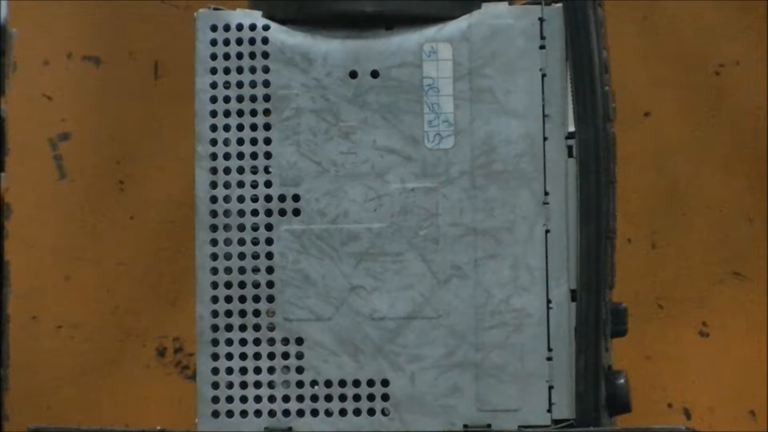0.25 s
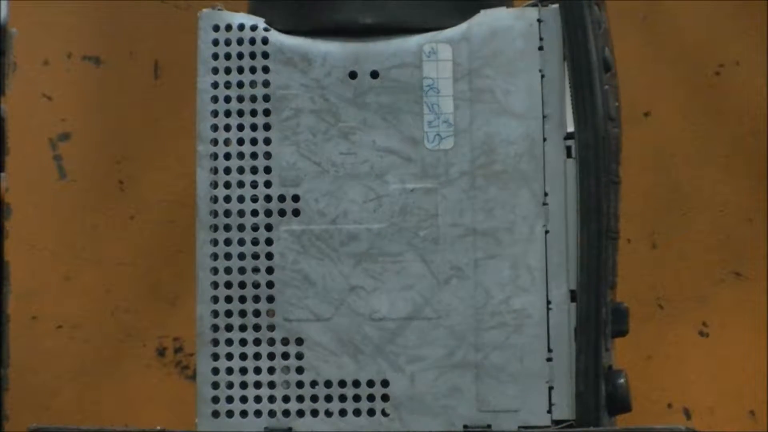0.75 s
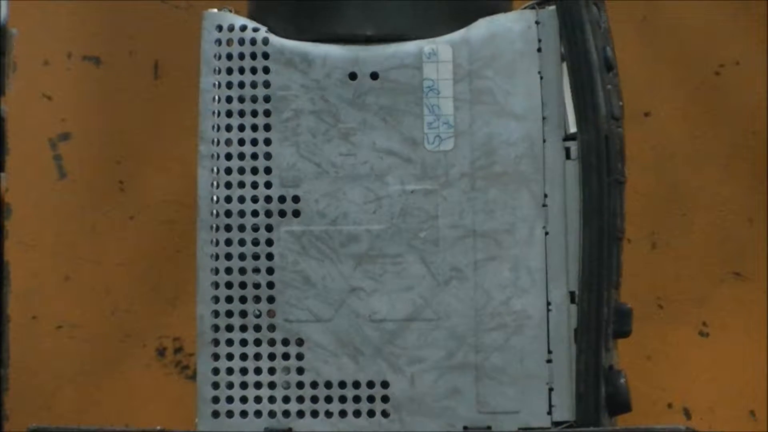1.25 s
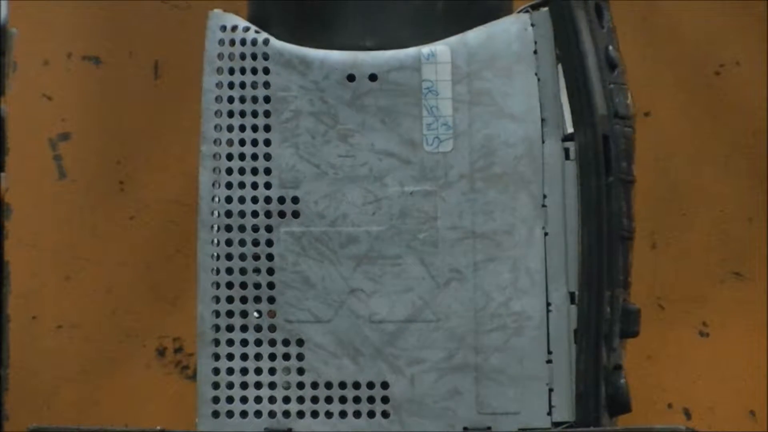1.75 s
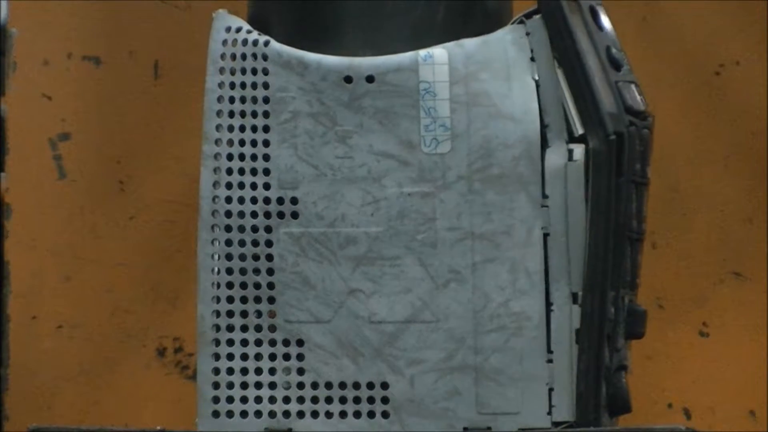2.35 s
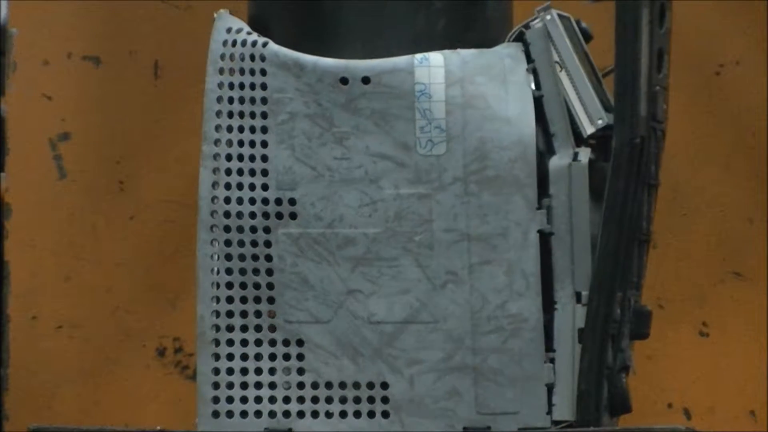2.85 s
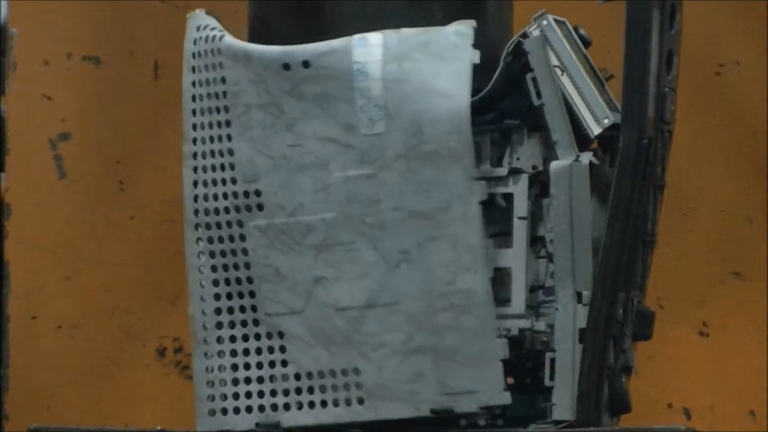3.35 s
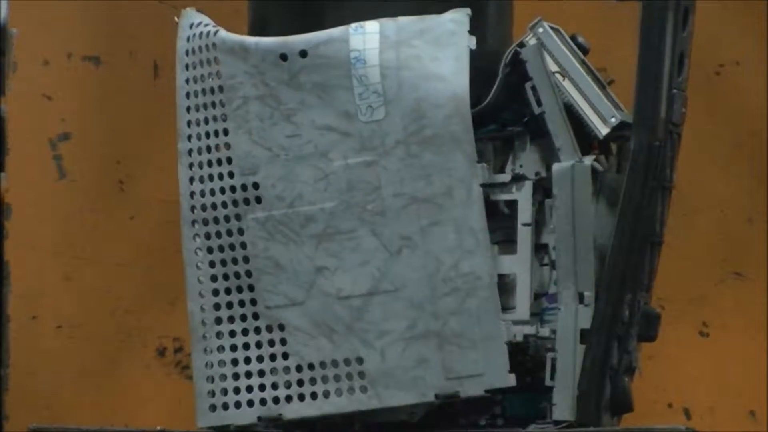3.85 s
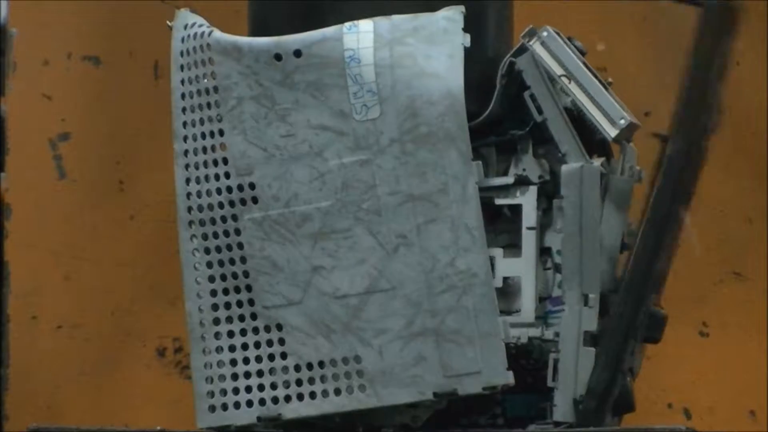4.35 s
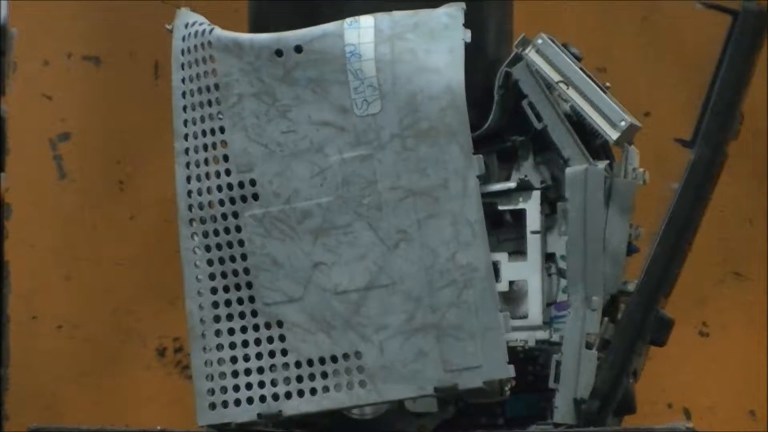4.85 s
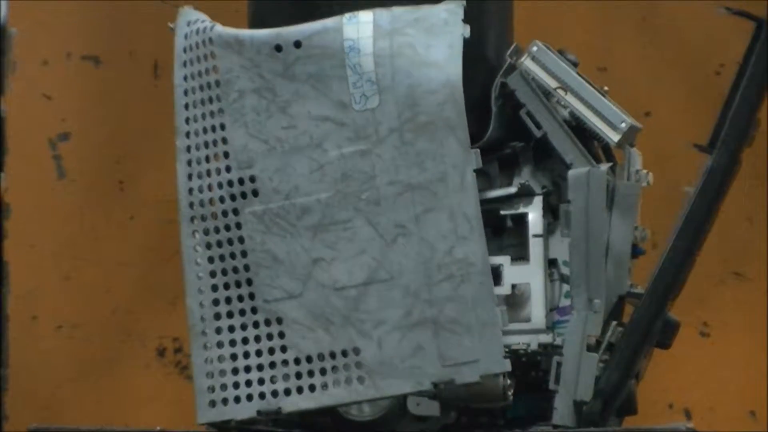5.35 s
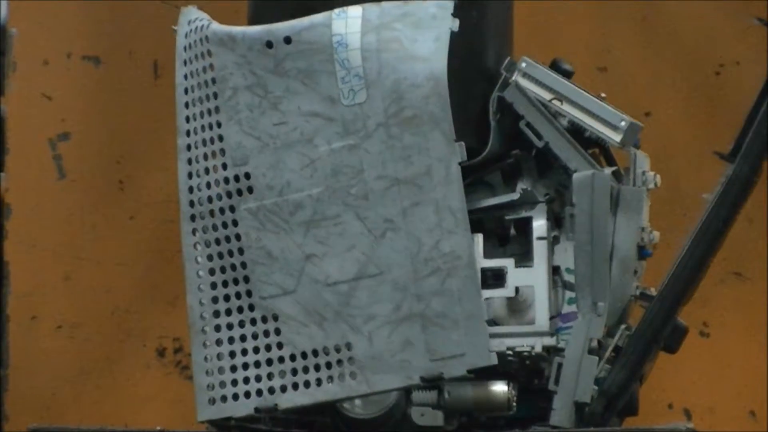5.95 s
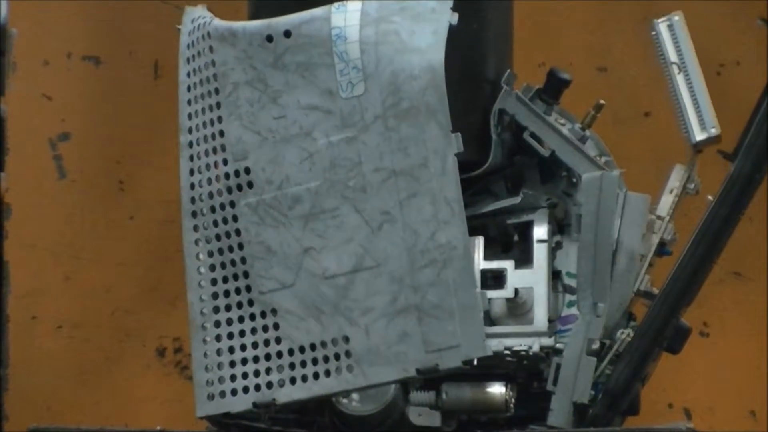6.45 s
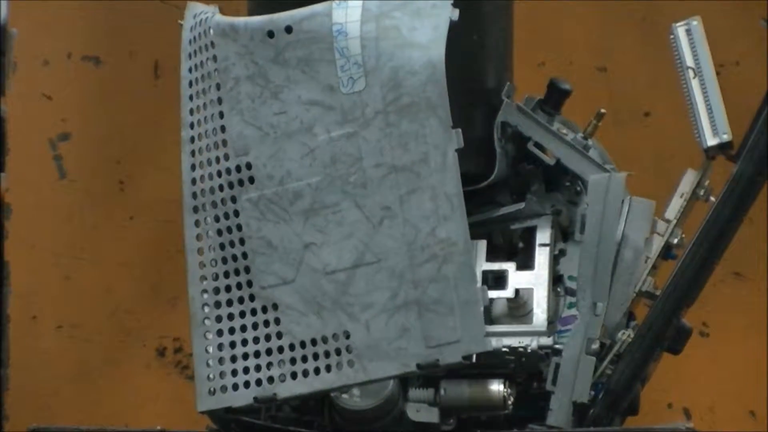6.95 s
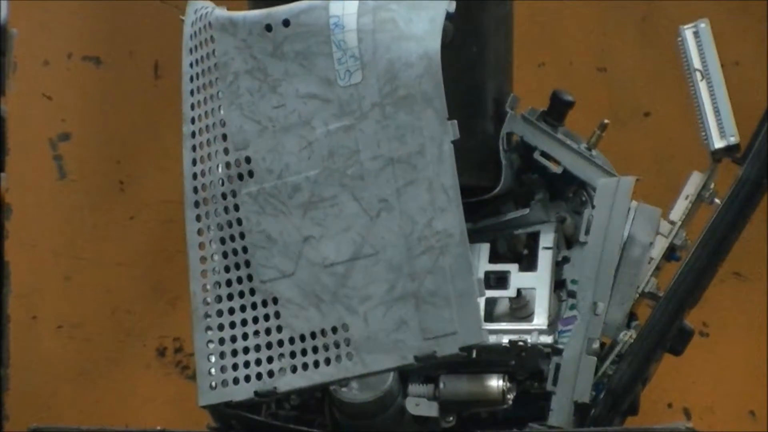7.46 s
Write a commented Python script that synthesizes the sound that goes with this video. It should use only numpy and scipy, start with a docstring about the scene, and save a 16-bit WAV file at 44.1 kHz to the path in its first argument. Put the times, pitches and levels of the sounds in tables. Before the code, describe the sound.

A hydraulic unit whines and hisses while a metal case buckles in sharp crackles, hollow pops and brief scrapes, with short room echoes.

```python
"""Hydraulic press crushing a metal case

A press slowly crushes the sheet-metal case of a device in an echoing workshop. Noise bursts and damped
tones make the snaps; dense tiny bursts make the creaks and scrapes, and wavering tones the groans.
Partials of a turning shaft make the pump's whine, over hissing oil and a rumbling frame.
The recorder's limiter flattens the strong snaps, so the whine sinks and swells back as the echo dies."""
import sys
import numpy as np
from scipy import signal
from scipy.fft import rfft, irfft, next_fast_len
from scipy.io import wavfile
from scipy.ndimage import uniform_filter1d

SR = 44100
rng = np.random.default_rng(int(sys.argv[2]) if len(sys.argv) > 2 else 0)


def unload_wav(signal):
    """Save mono or channel-first audio to the path in sys.argv[1] as 16-bit WAV at rate SR, clipped to [-1, 1]."""
    wavfile.write(
        sys.argv[1],
        SR,
        np.round(np.clip(np.atleast_2d(signal).T, -1, 1) * 32767).astype(np.int16),
    )


N = 339570
TIME = np.arange(N) / SR  # seconds
EDGE_HZ = 16000  # upper edge of the sound


def amp(db):
    """Turns decibels into a gain."""
    return np.exp(np.asarray(db) * (np.log(10) / 20))


def unit(x):
    """Scales a signal to an rms of one."""
    return x / np.sqrt(np.mean(x ** 2) + 1e-20)


def at_hz(points, hz):
    """Reads a table between its points on a log-frequency axis."""
    table_hz, value = np.transpose(points)
    return np.interp(np.log(hz + 1), np.log(table_hz + 1), value)


def curve(points):
    """Reads a table of moments at every sample."""
    return np.interp(TIME, *np.transpose(points))


def drift(rate):
    """A slow random wander of rms one, with `rate` new values a second."""
    knots = rng.standard_normal(400)
    return unit(np.interp(TIME * rate, np.arange(len(knots)), knots))


def power(pair, size=132):
    """Mean power of both channels over three milliseconds."""
    return np.abs(uniform_filter1d((pair ** 2).mean(0), size)) + 1e-14


# How alike the left and right sound. Each row: frequency in Hz, likeness from 0 to 1.
LIKENESS = [(30, 0.98), (300, 0.79), (1200, 0.85), (3000, 0.75), (5000, 0.82), (9000, 0.47), (15000, 0.56)]


def colour(pair, spectrum, bright_db=0):
    """Gives two unrelated signals a spectrum and mixes them into an equally alike left and right."""
    size = pair.shape[1]
    hz = np.fft.rfftfreq(size, 1 / SR)
    mid, side = rfft(pair)
    alike = np.clip(at_hz(LIKENESS, hz), 0, .995)
    mid = mid * np.sqrt((1 + alike) / 2)
    side = side * np.sqrt((1 - alike) / 2)
    # brightness lifts the treble and lowers the rest by 0.8 of its value
    shelf = at_hz([(3500, -0.8), (9500, 0.8)], hz)
    gain = amp(at_hz(spectrum, hz) + bright_db * shelf)
    return irfft(np.array([mid + side, mid - side]) * gain, size)


# The size of a part sets its timbre: wide panels ring low and flex, small tabs ring high and mostly crack.
PANEL_HZ = 1500  # reference pitch
BRIGHT_DB, BRIGHT_DB_PER_OCTAVE = -5, 1.68
FLEX_DB, FLEX_DB_PER_OCTAVE = 13.5, -7  # flexing against fracture, for a 0 dB snap at PANEL_HZ at the start
FLEX_DB_PER_DB = 0.6  # a harder snap bends more of the panel
FLEX_DB_PER_S = -1.93  # the panels stiffen as they fold up


def timbre(s, db, part_hz):
    """Brightness and flexing of a snap in dB: pitch, strength and moment tell how its part bends."""
    octaves = np.log2(part_hz / PANEL_HZ)
    bright_db = BRIGHT_DB + BRIGHT_DB_PER_OCTAVE * octaves
    flex_db = FLEX_DB + FLEX_DB_PER_OCTAVE * octaves + FLEX_DB_PER_DB * db + FLEX_DB_PER_S * s
    return bright_db, flex_db


# The sharp fracture. Each row: frequency in Hz, level in dB per Hz.
FRACTURE_SPECTRUM = [(40, -65), (200, -54), (700, -12.5), (1500, -2), (2800, -3), (4500, -1), (7000, -1),
                     (10000, 1), (13000, -8.5), (16000, -36)]
# The dull flexing of the panel. Each row: frequency in Hz, level in dB per Hz.
FLEX_SPECTRUM = [(40, -28), (200, -15.5), (400, -4.5), (800, 0.5), (1300, 2), (2000, -3), (2800, -1),
                 (4500, -12), (9000, -44)]
PIECE_SPREAD_DB = 2.5  # how much the colour of the fracture differs from piece to piece


def snap(t60, bright_db, panel_db, part_hz, first_db=2, tear=0.073, ring_db=-3.5, part_db=-5,
         ring_width=16, part_spread=0.422, grit_db=3, size=6144):
    """A fracture tears on briefly, scatters through the case as a gritty burst and rings a cluster of modes."""
    t = (np.arange(size) - size // 96) / SR
    age = np.maximum(t - tear * t60, 0)  # long breaks tear for longer before they die away
    decay = (t >= 0) * amp(-60 * age / t60)
    grit = unit(uniform_filter1d(rng.standard_normal(size), size=36))
    fade = decay * amp(grit_db * grit)
    first = 1 + amp(first_db) * np.exp(-np.abs(t) / .0005)  # a stronger first instant
    # each broken piece favours its own bands
    bands_hz = np.geomspace(40, EDGE_HZ, num=40)
    bands_db = at_hz(FRACTURE_SPECTRUM, bands_hz) + PIECE_SPREAD_DB * rng.standard_normal(len(bands_hz))
    piece = np.transpose([bands_hz, bands_db])
    crack = unit(colour(rng.standard_normal((2, size)) * fade * first, piece, bright_db))
    flex = unit(colour(rng.standard_normal((2, size)) * fade, FLEX_SPECTRUM))
    # close, heavily damped modes: the shorter and higher the ring, the wider the cluster
    width_hz = np.hypot(ring_width / t60, part_spread * part_hz)
    cluster = np.linspace(-1, 1, num=25) + rng.uniform(-.04, .04, size=25)
    mode_hz = (part_hz + width_hz * cluster)[:, None]
    strike = rng.uniform(0, 2 * np.pi, size=(len(cluster), 1))
    modes = np.hanning(len(cluster)) ** 2 @ np.sin(2 * np.pi * mode_hz * t + strike)
    ring = unit(modes * np.clip(t * part_hz, 0, 1) * decay)
    # the broken part always rings a little; a flexing panel rings much more
    ring = ring * np.hypot(amp(part_db), amp(panel_db + ring_db) / np.sqrt(2))
    burst = crack + amp(panel_db) * flex / np.sqrt(2)
    # the microphone faces the ringing part; the room gets the burst
    near, spread = burst + ring, burst
    return np.array([near, spread]) / np.sqrt(power(near).max())


# Snaps, loud and faint. Each row: moment in seconds, level in dB of the loudest 3 ms, time in seconds to
# fade by 60 dB, pitch in Hz of the part that gives way.
SNAPS = [(.048, -34, 0.017, 7500), (.063, -33.5, 0.035, 7100), (.0705, -18.5, 0.044, 1840),
         (0.1291, -22.5, 0.036, 1970), (.1526, -31.5, 0.07, 2070), (.186, -14.5, 0.018, 2130),
         (0.3599, -23.5, 0.011, 4700), (.4058, -19, 0.025, 1960), (.432, -29, 0.036, 1310),
         (.453, -28.5, .052, 2160), (0.4729, -14, 0.044, 4140), (0.584, -27.5, 0.028, 4720),
         (.609, -31.5, 0.027, 8060), (.7602, -30.5, 0.029, 8700), (.8128, -32.5, 0.021, 8300),
         (0.858, -25.5, 0.025, 4000), (0.9041, -25, 0.041, 8600), (0.9775, -29.5, 0.04, 4000),
         (1.052, -31, 0.029, 1880), (1.0938, -36, 0.027, 5970), (1.3543, -30, 0.031, 6860),
         (1.3769, -24, 0.048, 4800), (1.443, -27.5, 0.049, 5900), (1.449, -25.5, 0.054, 6570),
         (1.4785, -28, 0.017, 1840), (1.494, -22.5, 0.073, 1600), (1.501, -19, 0.059, 1630),
         (1.5826, -18.5, 0.039, 1630), (1.6282, -23.5, 0.023, 6730), (1.7212, -17.5, 0.036, 1800),
         (1.7697, -23, 0.026, 6900), (1.822, -23.5, 0.023, 9470), (1.861, -31, 0.022, 7040),
         (1.9528, -22, 0.05, 5400), (2.012, -32, 0.031, 6760), (2.0822, -21, 0.08, 1666),
         (2.2082, -32, 0.023, 9540), (2.325, -22.5, 0.055, 9360), (2.3476, -25, 0.054, 2470),
         (2.3773, -24, 0.046, 1450), (2.3861, -20, 0.045, 1980), (2.5198, -23, 0.038, 1240),
         (2.5919, -23.5, 0.072, 4530), (2.716, -36, 0.025, 1930), (2.9785, -32.5, 0.024, 4720),
         (3.159, -36, 0.063, 834), (3.164, -24, 0.054, 1740), (3.2946, -27, 0.031, 1790),
         (3.351, -33, 0.053, 3960), (3.3898, -16, 0.052, 1500), (3.5394, -26, 0.076, 8500),
         (3.6036, -19, 0.032, 1810), (3.6224, -23.5, 0.039, 8900), (3.7254, -19, 0.053, 1750),
         (3.8464, -28, 0.038, 8830), (3.88, -33, .035, 3120), (3.9358, -14, 0.05, 1542),
         (4.2171, -23.5, 0.03, 3550), (4.309, -19.5, 0.064, 5040), (4.374, -22, 0.038, 1430),
         (4.3877, -18.5, 0.055, 1470), (4.505, -32, 0.024, 7650), (4.5237, -31, .031, 7900),
         (4.5398, -31, 0.04, 7850), (4.568, -28, 0.04, 9800), (4.6186, -24, 0.041, 8880),
         (4.6614, -25, 0.057, 1830), (4.6974, -21, 0.058, 5560), (4.7658, -15, 0.055, 1693),
         (4.848, -30.5, .025, 7940), (5.0072, -26, 0.029, 10100), (5.141, -28, 0.032, 6750),
         (5.153, -36, 0.07, 7750), (5.1845, -24.5, 0.029, 2480), (5.2695, -32.5, 0.055, 4540),
         (5.3526, -24, 0.03, 4730), (5.4503, -21.5, 0.039, 2790), (5.533, -34.5, 0.064, 2540),
         (5.6807, -34, 0.05, 4840), (5.8055, -19, 0.049, 2130), (5.89, -30, 0.061, 3300),
         (5.9285, -24.5, 0.027, 2340), (5.9397, -23, 0.031, 2100), (5.9913, -32.5, 0.042, 7040),
         (6.0374, -21, 0.05, 4310), (6.0623, -24.5, 0.059, 6000), (6.117, -38, .02, 6000),
         (6.398, -35.5, 0.02, 8250), (6.6073, -23.5, 0.03, 4740), (6.739, -36.5, 0.032, 6160),
         (6.786, -37.5, 0.069, 7640), (6.833, -31, 0.051, 3950), (6.861, -36.5, .035, 1270),
         (6.9563, -29, 0.016, 2080), (7.1108, -30.5, 0.055, 6500), (7.2191, -33, 0.043, 9400),
         (7.5716, -31.5, 0.033, 4070), (7.618, -36, 0.034, 1780)]


def snaps(rows, size=6144):
    """Places every snap at its moment, as sent to the microphone and into the room."""
    out = np.zeros((2, 2, N + size))
    for s, db, t60, part_hz in rows:
        start = max(round(s * SR) - size // 96, 0)
        bright_db, flex_db = timbre(s, db, part_hz)
        out[..., start:start + size] += amp(db) * snap(t60, bright_db, flex_db, part_hz, size=size)
    return out[..., :N]


TICKS_PER_S, TICK_T60_S = 7, 0.018
TICK_SOFTEST_DB, TICK_RANGE_DB = -48.25, 7
TICK_HZ, TICK_SPREAD_OCTAVES = 6000, 0.71  # middle pitch, and how far it strays up or down


def ticks(count=100):
    """Faint ticks of tabs and solder joints at random moments, in rows like those of the snaps."""
    gap, level, pitch = rng.random((count, 3)).T
    times = np.cumsum(-np.log(1 - gap)) / TICKS_PER_S
    levels_db = TICK_SOFTEST_DB + TICK_RANGE_DB * level
    pitches_hz = TICK_HZ * 2 ** (TICK_SPREAD_OCTAVES * (2 * pitch - 1))
    return [(s, db, TICK_T60_S, hz) for s, db, hz in zip(times, levels_db, pitches_hz) if s < N / SR]


# Panels that buckle and sound a clear note. Each row: moment in seconds, pitch in Hz, level in dB,
# time in seconds to fade by 60 dB.
BUCKLING_PANELS = [(.4065, 2130, -23, .04), (1.4788, 1790, -15, 0.017), (1.4955, 2290, -19, .04),
                   (1.629, 173, -47, 0.18), (1.7215, 1260, -18, 0.033), (2.083, 1583, -12.5, 0.023),
                   (2.385, 1085, -14.5, 0.11), (2.387, 2050, -15, .025), (2.5205, 1160, -20, 0.034),
                   (2.522, 2240, -21, 0.048), (3.162, 1040, -16, 0.022), (3.1635, 2240, -17.5, .025),
                   (3.164, 650, -20, 0.018), (3.295, 1750, -22, 0.034), (3.3908, 1130, -16, 0.022),
                   (3.3907, 1790, -9.5, 0.027), (3.9363, 1454, -6, 0.038), (4.7662, 1620, -11, 0.019),
                   (6.0737, 1166, -22, 0.039)]


def buckles(rise_s=0.00094):
    """A panel pops through and rings in one mode."""
    out = np.zeros(N)
    for s, hz, db, t60 in BUCKLING_PANELS:
        part = out[round(s * SR):][:SR // 4]
        t = TIME[:len(part)]
        part += amp(db - 60 * t / t60) * (1 - np.exp(-t / rise_s)) * np.sin(2 * np.pi * hz * t)
    return out


# Tiny slips of strained metal. Each row: frequency in Hz, level in dB per Hz.
SLIP_SPECTRUM = [(40, -29), (110, -16), (200, -6.5), (400, 4.5), (1150, 2), (1800, 3), (2800, -1),
                 (4200, -1), (7000, -3.5), (10000, -5.5), (13600, -12.5), (14600, -50)]


def creak(size, bright_db, per_s, spread_db, t60):
    """Dense tiny slips of uneven size, each a brief burst in the case."""
    sizes_db = spread_db * np.minimum(rng.exponential(1, size), np.pi)  # capped, so no slip stands out
    slips = (rng.random(size) < per_s / SR) * amp(sizes_db) ** 2
    energy = signal.lfilter([1], [1, -amp(-120 / (t60 * SR))], slips)
    return unit(colour(rng.standard_normal((2, size)) * np.sqrt(energy), SLIP_SPECTRUM, bright_db))


CREAK_START_DB, CREAK_DB_PER_S = -46.5, -.5


def strain():
    """The case creaks quietly under load, less as it flattens."""
    level = amp(CREAK_START_DB + CREAK_DB_PER_S * TIME)
    return level * creak(N, bright_db=-2.0, per_s=1100, spread_db=6.0, t60=0.066)


SLIDE_ATTACK_S, SLIDE_RELEASE_S = 0.0067, 0.057


def stroke(t, length):
    """A slide swells, holds and dies away."""
    return np.minimum(t / SLIDE_ATTACK_S, 1) * np.exp(-np.maximum(t - length, 0) / SLIDE_RELEASE_S)


def resonate(x, hz, width_hz):
    """A steep resonance that follows the curve hz."""
    turn = np.exp(2j * np.pi * np.cumsum(hz) / SR)
    r = np.exp(-np.pi * width_hz / SR)
    # shift the resonance down to zero, smooth twice, shift back
    return (turn * signal.lfilter([(1 - r) ** 2], [1, -2 * r, r * r], x / turn)).real


# Strained sheets that scrape over each other. Each row: start in seconds, length in seconds, level in dB,
# brightness in dB, resonance of the sheet in Hz.
SCRAPING_SHEETS = [(0.017, 0.12, -42.5, -5, 770), (0.123, 0.053, -39, -9, 970),
                   (0.237, 0.36, -41.5, -3, 2150), (0.401, 0.095, -39.5, -9, 1150),
                   (0.48, 0.15, -42, -20, 885), (0.713, 0.013, -36.5, 2.5, 2230),
                   (1.445, 0.11, -37, -5, 1760), (1.494, 0.044, -41, -18, 468),
                   (2.089, 0.29, -48.5, 1.5, 1990), (2.346, 0.15, -34.5, -3.5, 2100),
                   (2.981, 0.27, -51, 7, 7000), (3.199, 0.078, -37.5, -3.5, 1080),
                   (3.411, 0.11, -35.5, -6, 1810), (3.969, 0.27, -41.5, -10, 1660),
                   (4.0, 0.08, -40, 1, 3900), (4.493, 0.25, -45.5, 1, 4440), (5.864, 0.16, -41, -0.5, 2130),
                   (6.66, 0.16, -44.5, 1.5, 4200), (6.798, 0.2, -47, -14, 1220)]
SHEET_WIDTH, SHEET_WANDER = 0.44, 0.046  # width and wander of the resonance as shares of its pitch
SHEET_DB, SHEET_DB_PER_DB = -6, -0.37  # its level against the bare slips; duller scrapes drive it harder


def scrapes(size=32768):
    """Sheets slide: a run of fine slips drives one resonance, which wanders as the sheet bends."""
    out, t = np.zeros((2, N + size)), TIME[:size]
    for s, length, db, bright_db, hz in SCRAPING_SHEETS:
        slips = creak(size, bright_db, per_s=1200, spread_db=4.0, t60=0.024)
        bend = 1 + SHEET_WANDER * drift(19.3)[:size]
        sheet = unit(resonate(slips, hz * bend, SHEET_WIDTH * hz))
        sheet_gain = amp(SHEET_DB + SHEET_DB_PER_DB * bright_db)
        start = round(s * SR)
        out[:, start:start + size] += amp(db) * stroke(t, length) * unit(slips + sheet_gain * sheet)
    return out[:, :N]


# Bent panels that groan on one note as they slide. Each row: start in seconds, length in seconds,
# level in dB, starting pitch in Hz.
GROANING_PANELS = [(0.45, 0.1, -41.5, 415), (2.393, 0.1, -39, 1108), (2.39, 0.11, -43.5, 430),
                   (3.41, 0.1, -49.5, 395)]
GROAN_SAG_PER_S = 0.097  # share of the pitch lost each second
GROAN_WAVER_HZ, GROAN_ROUGH = 25.8, 0.25  # unevenness of pitch and of level


def groans(size=16384):
    """Stick and slip keep one mode of a panel ringing, unsteady and slowly sagging."""
    out, t = np.zeros(N + size), TIME[:size]
    for s, length, db, hz in GROANING_PANELS:
        waver, rough = unit(uniform_filter1d(rng.standard_normal((2, size)), size=300))
        pitch_hz = hz * (1 - GROAN_SAG_PER_S * t) + GROAN_WAVER_HZ * waver
        turns = np.cumsum(pitch_hz) / SR
        tone = unit((1 + GROAN_ROUGH * rough) * np.sin(2 * np.pi * turns))
        start = round(s * SR)
        out[start:start + size] += amp(db) * stroke(t, length) * tone
    return out[:N]


# The pump's strong partials. Each row: multiple of the shaft speed, level in dB before the pressure acts.
PUMP_PARTIALS = [(6, -65.5), (11, -59.5), (12, -41.5), (14, -59.5), (20, -56), (22, -51), (24, -50),
                 (26, -48), (27, -60.5), (32, -62), (36, -54.5), (42, -62), (46, -57), (47, -61), (48, -53),
                 (49, -46.5), (50, -59.5), (51, -64), (60, -61), (132, -65), (228, -66)]
# Oil pressure, which swells the low partials most and the frame's rumble. Each row: moment in seconds, dB.
OIL_PRESSURE = [(0, -17), (.95, -22), (1.25, -14.5), (1.9, -16.5), (3.0, -11.5), (3.6, -10.5), (4.5, -12),
                (5.75, -6), (6.4, -8.5), (7.0, -3.5), (7.7, -4.5)]
# Where the pump sits. Each row: frequency in Hz, left minus right in dB.
PUMP_BALANCE = [(360, -3), (700, 4), (1450, 4.5), (3000, -5)]
SHAFT_HZ = 29.963
PIPE_SPREAD = 21.2  # a partial this many multiples higher arrives one turn later
# a weak buzz fills the multiples between the strong partials
BUZZ_MULTIPLES, BUZZ_DB, BUZZ_SPREAD_DB = range(6, 62), -70.5, 1
THROB_SLIP_AT_S, THROB_SLIP_TURNS = 4.388, .35  # the throb falls back by a third of a beat


def pump(waver_db=1.5, low_hz=490, high_load=0.15):
    """Shaft partials: the pipes delay the strong ones, so groups throb in turn, and scatter the weak ones."""
    turns = SHAFT_HZ * TIME - THROB_SLIP_TURNS * (TIME > THROB_SLIP_AT_S)
    pressure_db = curve(OIL_PRESSURE)
    # for each multiple: level in dB and lateness in turns of its own wave
    partials = {k: (BUZZ_DB + BUZZ_SPREAD_DB * rng.standard_normal(), rng.random()) for k in BUZZ_MULTIPLES}
    partials.update({round(k): (db, round(k) ** 2 / PIPE_SPREAD / 2) for k, db in PUMP_PARTIALS})
    out = np.zeros((2, N))
    for k, (db, late_turns) in partials.items():
        hz = k * SHAFT_HZ
        load = high_load + (1 - high_load) / (1 + (hz / low_hz) ** 4)  # grip of the pressure
        level = amp(db + load * pressure_db + waver_db * drift(4))
        line = level * np.cos(2 * np.pi * (k * turns - late_turns))
        out += amp(at_hz(PUMP_BALANCE, hz) * np.array([[.5], [-.5]])) * line
    return np.sqrt(2) * out  # the levels are rms levels


# Oil rushing through valves and the motor's fan. Each row: frequency in Hz, level in dB per Hz.
RUSH_SPECTRUM = [(25, -36), (70, -29), (150, -11), (300, 4.5), (480, 5), (800, 8), (1200, 5.5), (1700, 0.5),
                 (2500, 1.5), (4000, -3.5), (7000, -5), (10000, -23), (13000, -10), (14600, -50)]


def rush(level_db=-52):
    """The steady hiss of oil and cooling air: coloured noise."""
    return amp(level_db) * unit(colour(rng.standard_normal((2, N)), RUSH_SPECTRUM))


# The press frame under pressure. Each row: frequency in Hz, level in dB per Hz.
RUMBLE_SPECTRUM = [(25, -7), (60, -4), (120, 6), (175, -9), (260, -6), (700, -40), (2000, -90)]


def rumble(level_db=-69.5):
    """A faint shudder of the frame that follows the oil pressure."""
    noise = rng.standard_normal((2, next_fast_len(N)))
    shudder = unit(colour(noise, RUMBLE_SPECTRUM)[:, :N])
    return amp(level_db + curve(OIL_PRESSURE)) * shudder


# Colour of the workshop's echo. Each row: frequency in Hz, level in dB.
ECHO_SPECTRUM = [(100, -1), (400, 1.5), (900, -7), (1700, -2), (3500, -6), (7000, -8.5), (11000, -7.5),
                 (13500, -1), (15000, -25)]
# How long the echo lasts. Each row: frequency in Hz, time in seconds to fade by 60 dB.
ECHO_FADE = [(200, 0.54), (1500, 0.68), (4000, 0.83), (8000, 0.7), (14000, 0.28)]


def workshop(sound, level_db=-2, build_s=0.0052):
    """A diffuse echo that builds up quickly and dies soonest in the high treble."""
    hz, t, noise = signal.stft(rng.standard_normal((2, SR)), SR, nperseg=256)
    fade = amp(-60 * t / at_hz(ECHO_FADE, hz)[:, None])
    build = 1 - np.exp(-t / build_s)
    tail = signal.istft(noise * fade * build, SR, nperseg=256)[1]
    tail = colour(tail / np.linalg.norm(tail[0]), ECHO_SPECTRUM)
    return amp(level_db) * signal.fftconvolve(sound.mean(0)[None], tail, axes=1)[:, :N]


def scene():
    """The breaking case and the echo of its snaps over the hydraulic unit."""
    near, spread = snaps(SNAPS) + snaps(ticks(), size=2048)
    case = near + buckles() + strain() + scrapes() + groans()
    machine = pump() + rush() + rumble()
    return case + workshop(spread) + machine


def held(over_db, release_s):
    """Jumps up to each peak and lets go exponentially."""
    fall = TIME / release_s
    return np.exp(np.maximum.accumulate(np.log(over_db + 1e-9) + fall) - fall)


def record(dry, limit_db=-27.0, treble_bias=1.853, release_s=0.3, quick_s=0.093, overshoot=0.26,
           lag_s=0.014, start_db=4):
    """A limiter, touchiest in the treble, overshoots, recovers slowly and rounds spikes; then the band limit."""
    sensed = dry + treble_bias * np.diff(dry, prepend=0)
    over_db = np.maximum(10 * np.log10(power(sensed)) - limit_db, 0)
    over_db = np.maximum(over_db, start_db * (TIME == 0))  # it starts partly closed
    pole = np.exp(-1 / (lag_s * SR))
    late_db = signal.lfilter([1 - pole], [1, -pole], held(over_db, quick_s))
    limited = dry * amp(-held(over_db, release_s) - overshoot * late_db)
    rounded = limited / (1 + (limited / .09) ** 4) ** .25
    low_pass = signal.firwin(511, EDGE_HZ, window=("kaiser", 9), fs=SR)
    return signal.oaconvolve(rounded, low_pass[None], "same", axes=1)


dry = scene()
out = record(dry)
unload_wav(out)
```